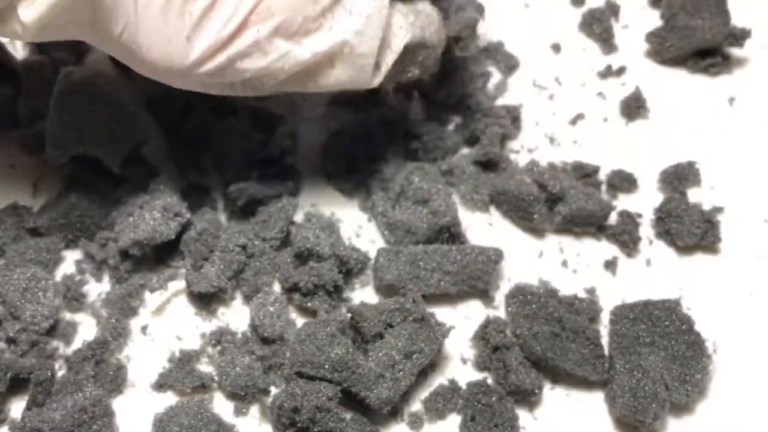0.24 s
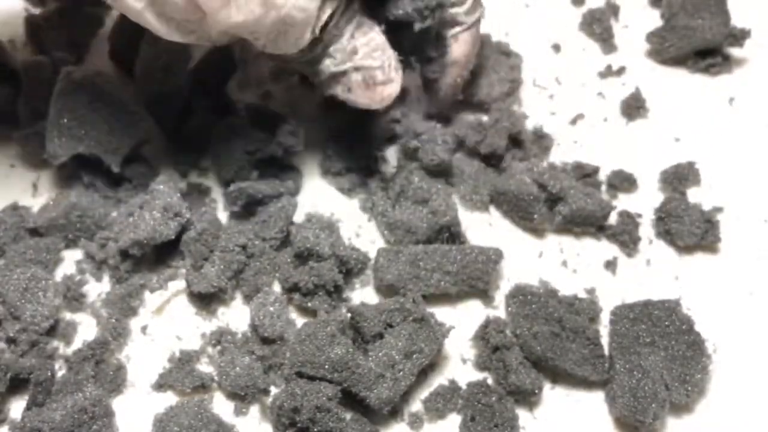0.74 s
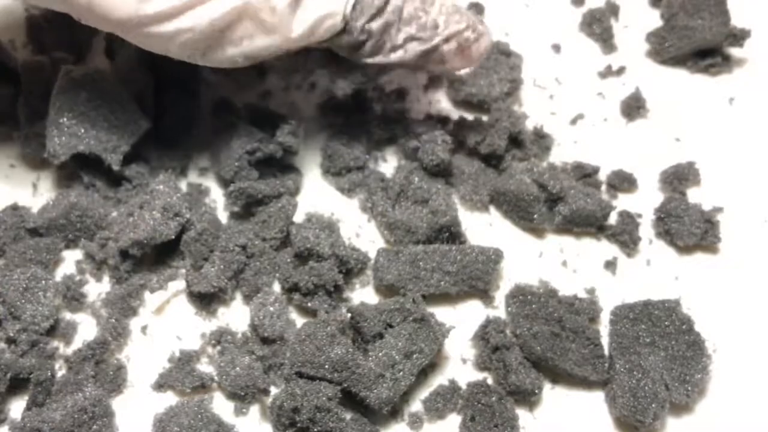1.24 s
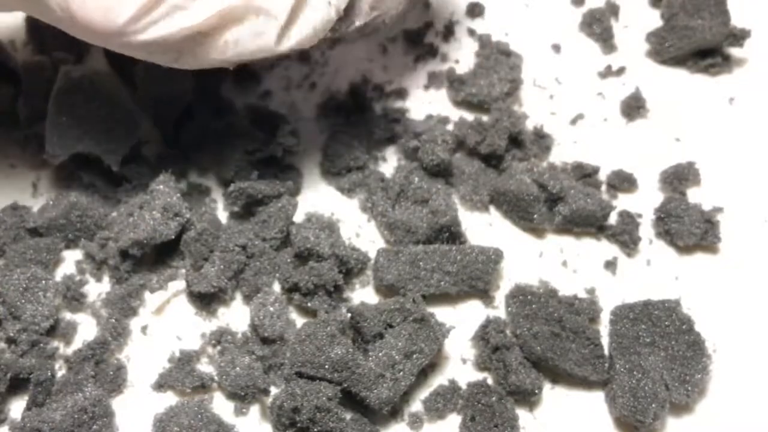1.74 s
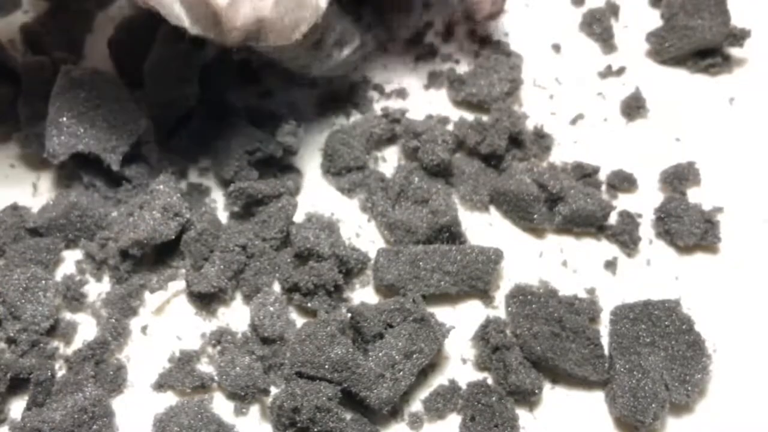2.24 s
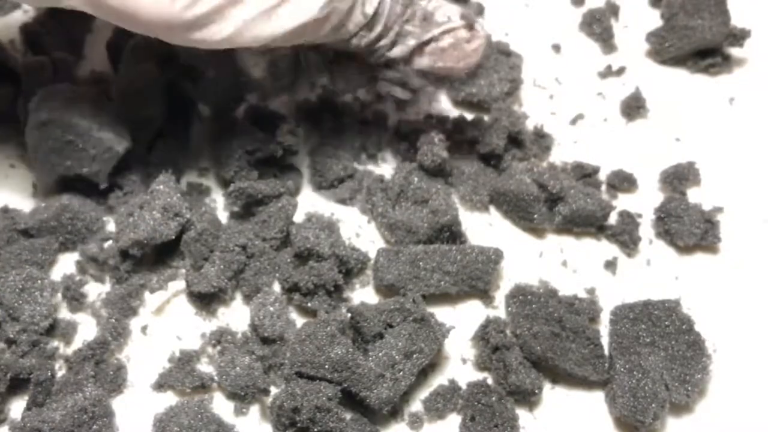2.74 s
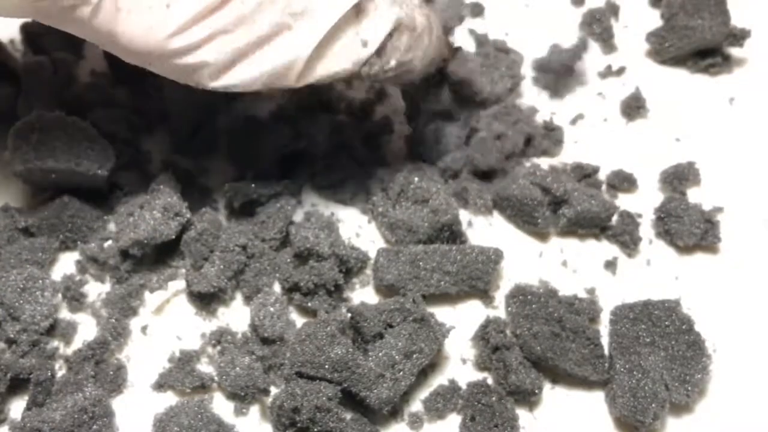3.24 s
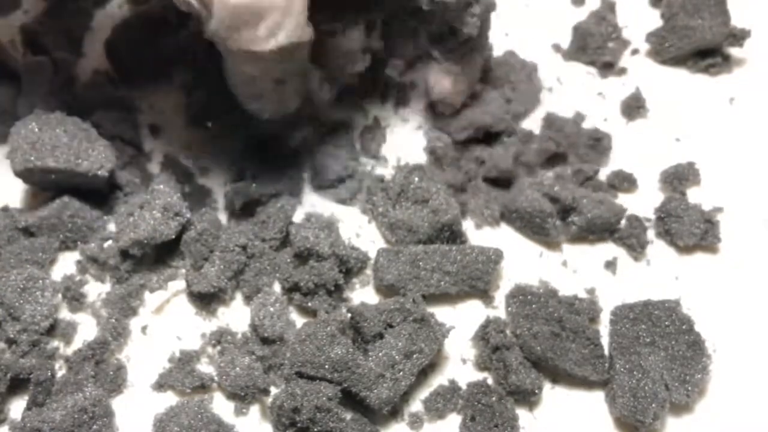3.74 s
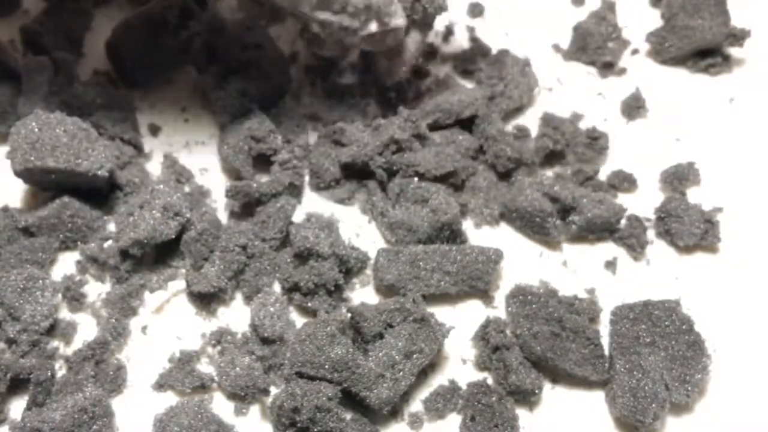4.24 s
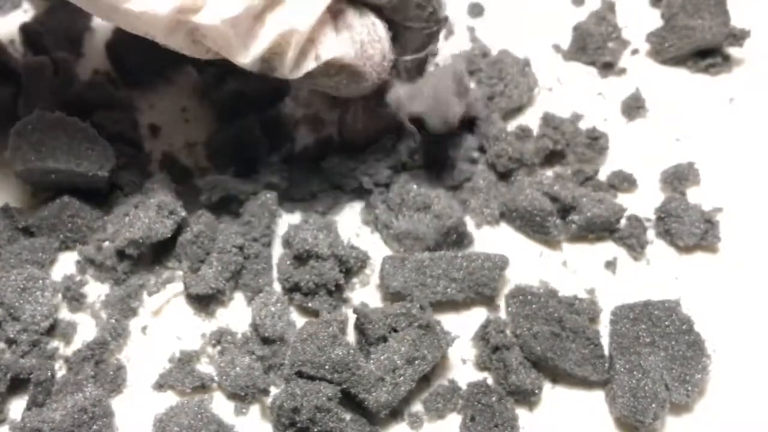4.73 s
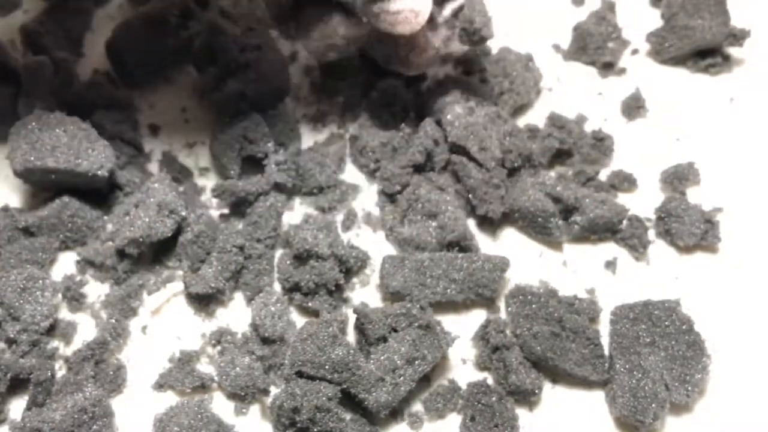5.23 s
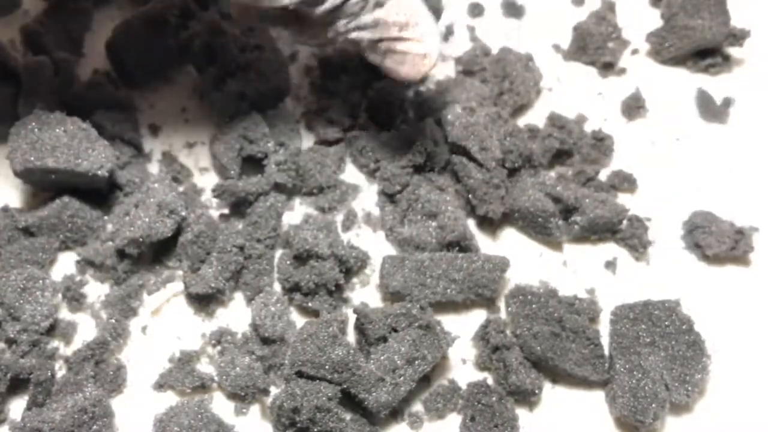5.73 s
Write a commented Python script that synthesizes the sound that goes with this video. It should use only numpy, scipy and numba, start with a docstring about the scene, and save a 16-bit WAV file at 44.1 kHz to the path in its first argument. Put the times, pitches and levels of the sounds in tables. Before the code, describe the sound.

A gloved hand crushes crunchy foam in uneven squeezes, with sharp ticks and fine crackling, while a fridge-like hum drones behind.

```python
"""Dry, brittle foam is squeezed and crumbled by a gloved hand over a table, close to a phone.
In each squeeze the pressure builds, holds and lets go: random impulses, for thousands of tiny cell walls
breaking, ring through the resonances of the pieces in a crisp hiss. Bigger walls crack, one piece snaps
and the rubber glove squeaks faintly, as a gliding tone. Behind it a motor, probably a fridge compressor,
hums in throbbing harmonics in a small room with faint steady tones and shaped noise for its air."""
import sys
import numpy as np
from scipy import signal
from scipy.fft import rfft, irfft
from scipy.io import wavfile
from scipy.ndimage import uniform_filter1d
from numba import njit

SR = 44100
rng = np.random.default_rng(int(sys.argv[2]) if len(sys.argv) > 2 else 0)


def unload_wav(signal):
    """Save mono or channel-first audio to the path in sys.argv[1] as 16-bit WAV at rate SR, clipped to [-1, 1]."""
    wavfile.write(
        sys.argv[1],
        SR,
        np.round(np.clip(np.atleast_2d(signal).T, -1, 1) * 32767).astype(np.int16),
    )


N = 263718
T = np.arange(N) / SR

# Bright ringing of the finest breaks: peaks spread evenly through the treble. Each row: centre in Hz, width in
# Hz, level in dB against the other rows.
BRIGHT_MODES = [(8430, 690, -10), (9530, 1100, -1.5), (10960, 1080, -1), (12160, 1650, 0), (14100, 1150, 0.5),
                (15600, 1300, -6)]


def undb(db):
    """Decibels to gain."""
    return 10 ** (np.asarray(db) / 20)


def unit(x):
    """Scale to rms 1."""
    return x / np.sqrt(np.mean(x ** 2))


def burst(x, db):
    """Scale a short sound to the energy of one millisecond at db."""
    return undb(db) * x * np.sqrt(SR / 1000) / np.linalg.norm(x)


def walk(rate):
    """Smooth chance with rms 1 that changes about rate times a second."""
    step = max(int(SR / rate), 2)
    held = np.repeat(rng.standard_normal(N // step + 1), step)
    return unit(uniform_filter1d(held, step)[:N])


def ringing(modes):
    """Causal impulse response, of energy 1, of a few broad resonances."""
    bins_hz = np.arange(1025) * SR / 2048
    power = sum(undb(db) ** 2 / (1 + (2 * (bins_hz - hz) / width) ** 2) ** 2 for hz, width, db in modes)
    # folding the cepstrum gives minimum phase: the ringing starts at once
    cepstrum = irfft(np.log(power) / 2)
    cepstrum[1:1024] *= 2
    cepstrum[1025:] = 0
    response = irfft(np.exp(rfft(cepstrum)))[:512]
    return response / np.linalg.norm(response)


def through(x, response):
    """Pass a sound through an impulse response."""
    return signal.fftconvolve(x, response)[:N]


@njit
def resonate(x, hz, width):
    """State-variable band-pass whose centre moves."""
    y, band, low = np.empty(len(x)), 0., 0.
    for i in range(len(x)):
        g, k = np.tan(np.pi * hz[i] / SR), width / hz[i]
        v = (band + g * (x[i] - low)) / (1 + g * (g + k))
        band, low, y[i] = 2 * v - band, low + 2 * g * v, k * v
    return y


def add(out, s, sound):
    """Mix a short sound in at time s."""
    i = int(s * SR)
    out[i:i + len(sound)] += sound[:N - i]


def fractures(rate, spread_db):
    """Random impulses, rate a second: most are small, a few are large."""
    hit = rng.random(N) < rate / SR
    size = undb(spread_db * np.minimum(rng.exponential(size=N), 4))
    sign = rng.choice([-1, 1], N)
    return unit(hit * size * sign / np.sqrt(rate))


def scatter(breaks, decay_s, trail_db):
    """Each break throws off dust: a short trail of noise, different every time."""
    keep = np.exp(-1 / (decay_s * SR))
    power = signal.lfilter([1 - keep], [1, -keep], breaks ** 2)
    return breaks + undb(trail_db) * np.sqrt(power) * rng.standard_normal(N)


def rupture(run_s, after_db):
    """One break followed by a quickly dying run of smaller ones."""
    t = T[:600]
    run = rng.standard_normal(len(t)) * np.exp(-t / run_s) * (1 - np.exp(-t / 0.00047))
    push = undb(after_db) * run / np.linalg.norm(run)
    push[0] = 1
    return push


def air():
    """Soft rumble and rush of the room: noise coloured along a smooth spectrum."""
    # Spectrum of the room's air. Each row: frequency in Hz, relative density in dB per Hz.
    spectrum = [(22, -3.5), (43, -1), (85, -4), (125, -10.5), (168, -1.5), (205, -4), (245, -7.5),
                (275, -6.5), (310, -10), (400, -10), (510, -18), (620, -15.5), (820, -8), (1020, -16),
                (1200, -14.5), (1700, -26), (6000, -31.5), (16000, -28.5)]
    air_db = -51  # rms
    hz, db = np.transpose(spectrum)
    noise = rfft(rng.standard_normal(N))
    bins_hz = np.maximum(np.arange(len(noise)) * SR / N, 1)
    colour = undb(np.interp(np.log(bins_hz), np.log(hz), db))
    return undb(air_db) * unit(irfft(noise * colour, N))


def drones():
    """Faint tones of fixed pitch that waver in level."""
    # Weak tones in the room. Each row: pitch in Hz, typical rms level in dB.
    tones = [(20.6, -65), (40.1, -59), (338.5, -69.5), (401, -74), (619, -84.5), (818, -75.5)]
    out = np.zeros(N)
    for hz, db in tones:
        level = undb(db + 2.3 * walk(rate=3.17))
        out += np.sqrt(2) * level * np.sin(2 * np.pi * (hz * T + rng.random()))
    return out


def motor():
    """The rotor slips behind the mains field, so its harmonics throb together about eight times a second."""
    # Shaft harmonics. Each row: multiple of the shaft rate, rms level in dB before throb and swell,
    # lower and upper sideband in dB against the harmonic.
    harmonics = [(1, -55, -32, -36), (2, -54, -31, -11.5), (3, -45.5, -43, -48), (4, -57.5, -7, -1),
                 (5, -67, -17, 2), (6, -57, -60, -5.5), (9, -82, -8, -32), (12, -72, -34, -14)]
    shaft_hz, mains_hz = 46.085, 50.043
    aligned_s, swell_hz = .056, .73  # throb and swell share this zero of phase
    since = T - aligned_s
    throb = np.exp(2j * np.pi * 2 * (mains_hz - shaft_hz) * since)
    # the lowest harmonic also swells and sinks slowly
    swell = 1 + 0.76 * np.exp(2j * np.pi * swell_hz * since)
    out = 0
    for k, db, lower_db, upper_db in harmonics:
        level = undb(db + 0.1 * walk(rate=3.1))
        line = level * np.exp(2j * np.pi * (k * shaft_hz * T + rng.random()))
        line = line * (1 + undb(lower_db) / throb + undb(upper_db) * throb)
        out = out + line * (swell if k == 1 else 1)
    return np.sqrt(2) * out.real


def squeaks():
    """Rubber sticks and slips on the foam: a tone and its octave, falling slightly in pitch."""
    # Slips of the glove. Each row: start in seconds, length in seconds, starting pitch in Hz,
    # level in dB of the fundamental at its peak, ahead of the room.
    slips = [(4.138, .04, 1720, -60), (4.245, .05, 1670, -65)]
    out = np.zeros(N)
    for s, length_s, hz, db in slips:
        t = T[:int(length_s * SR)]
        glide = 1 - 0.056 * t / length_s + 0.015 * walk(rate=600)[:len(t)]
        phase = 2 * np.pi * np.cumsum(hz * glide) / SR
        tone = np.sin(phase) + 0.44 * np.sin(2 * phase)
        add(out, s, undb(db) * np.sin(np.pi * t / length_s) * tone)
    return out


def snap():
    """A stiff piece breaks through with one loud tick."""
    # Resonances of the stiff piece. Each row: centre in Hz, width in Hz, level in dB against the other rows.
    snap_modes = [(880, 260, -14.5), (1470, 1300, -20.5), (2370, 760, -12.5), (4900, 1300, -27),
                  (7130, 470, -8), (8300, 1100, -4), (9190, 730, 4), (11500, 1640, 3), (13600, 2200, -12)]
    tick = np.convolve(rupture(run_s=0.0017, after_db=-9.0), ringing(snap_modes))
    out = np.zeros(N)
    add(out, .2856, burst(tick, db=-6.5))
    return out


def cracks(press_db):
    """Walls give way one at a time; the bigger the piece, the duller and longer the crack."""
    # Thick walls cracking. Each row: start in seconds, level over one millisecond in dB ahead of the room,
    # share of dull ringing in dB against the bright.
    thick = [(0.3234, -35.5, 12), (0.4168, -43, 3), (0.5008, -37.5, 15), (0.7758, -24.5, -8),
             (0.8079, -18, -20), (0.8568, -16, -16), (0.8636, -18, -16), (0.8908, -21, -17),
             (0.9302, -22, -14), (1.0096, -18.5, -18), (1.0262, -14, -21), (1.0306, -22, -19),
             (1.0448, -19, -23), (1.0497, -25, -17), (1.0736, -25, -22), (1.1226, -23, -18),
             (1.1578, -25, -16), (2.483, -34, 1), (2.5353, -30.5, -7), (2.8655, -30, -5), (3.2525, -29, 1),
             (3.2724, -33, -10), (3.658, -37.5, -15), (3.7468, -36.5, 1), (4.0083, -35, -6),
             (4.461, -24, -21), (4.4914, -23, -22), (4.5304, -23, -19), (4.547, -16.5, -5.5),
             (4.6004, -29, -7.5), (4.6777, -34, -7), (5.2731, -26, -13), (5.3293, -27, -21),
             (5.4465, -25.5, -21), (5.543, -29, -13), (5.8845, -38, -6)]
    # Resonances of a thick piece. Each row: centre in Hz, width in Hz, level in dB against the other rows.
    chunk_modes = [(1300, 840, -16), (2760, 970, 1), (4840, 1300, 5), (6640, 660, 5.5)]
    bright, dull = ringing(BRIGHT_MODES), ringing(chunk_modes)
    # thinner walls crack at random, about as strong as the pressure of the moment
    thin_per_s, above_press_db, spread_db = 36, 1, 2
    thin_dull_db, dull_spread_db = -15, 5
    times = rng.random(int(thin_per_s * N / SR)) * T[-1]
    thin = []
    for s in times:
        size, colour = rng.standard_normal(2)
        db = np.interp(s, T, press_db) + above_press_db + spread_db * size
        thin.append((s, db, thin_dull_db + dull_spread_db * colour))
    out = np.zeros(N)
    for s, db, dull_db in [*thick, *thin]:
        push = rupture(run_s=.001 * undb(.2 * dull_db), after_db=-2)
        add(out, s, burst(np.convolve(push, bright + undb(dull_db) * dull), db))
    return out


def squeezing():
    """Each squeeze swells, holds and dies away; overlapping ones add. Gives the dB of cells, crumbs and lumps."""
    # Squeezes of the hand. Each row: full pressure at this many seconds, build-up, hold and release in
    # seconds, level in dB of fine cells breaking, then of crumbs rubbing and of lumps crunching in dB
    # against the cells; all ahead of small trims in the mix.
    squeezes = [(0.002, .11, 0.098, 0.13, -45, -8, -28), (0.292, 0.065, .005, 0.2, -41.5, -9, -13.5),
                (0.537, 0.18, 0.2, 0.59, -42, -8.5, -16.5), (0.848, 0.17, 0.034, 0.3, -25.5, -13.5, -21.5),
                (1.027, .35, 0.19, 0.053, -36.5, -13, -24), (1.376, 0.089, 0.018, 0.15, -41.5, -9, -15),
                (1.498, 0.2, .02, 0.2, -44, -13.5, -20), (1.687, 0.13, .16, 0.08, -34.5, -9.5, -16.5),
                (2.015, 0.12, 0.012, .07, -39, -12.5, -13.5), (2.228, .068, .005, 0.45, -42, -10.5, -15.5),
                (2.441, .43, .29, 0.32, -38.5, -11, -19.5), (2.864, 0.12, .003, 0.038, -34, -8.5, -21.5),
                (3.028, 0.45, 0.011, .45, -42.5, -9, -18), (3.237, 0.13, .014, .052, -30, -11, -21),
                (3.41, .32, .13, 0.16, -49.5, -10.5, -13), (3.728, 0.12, .01, 0.22, -50, -5, -14),
                (3.924, .12, .024, 0.072, -44.5, -12.5, -21), (4.158, 0.14, .008, 0.35, -45, -11.5, -17),
                (4.546, .34, 0.0046, 0.084, -29.5, -12.5, -29), (4.786, 0.38, .006, .07, -44, -6.5, -16),
                (4.894, .18, .01, .06, -47, -5.5, -18), (5.04, .18, .013, .13, -41, -8.5, -15),
                (5.165, .083, .17, 0.3, -38, -10.5, -19.5), (5.437, 0.14, .003, 0.12, -35, -11, -25),
                (5.548, 0.082, .003, .075, -36.5, -8, -14), (5.626, .21, .05, .29, -48.5, -10, -16)]
    fade_db = 20  # gained over each build-up time, lost over each release time

    def powers(cells_db, crumbs_db, lumps_db):
        return undb(cells_db + np.array([[0], [crumbs_db], [lumps_db]])) ** 2

    # between squeezes the foam still shifts in the glove
    total = powers(cells_db=-57, crumbs_db=-5, lumps_db=-15)
    for s, build_s, hold_s, release_s, *levels in squeezes:
        before = np.maximum(s - T, 0) / build_s
        after = np.maximum(T - s - hold_s, 0) / release_s
        slack = np.minimum(before + after, 10)
        total = total + powers(*levels) * undb(-fade_db * slack) ** 2
    return 10 * np.log10(total)


def crumbling(press_db, crumb_db, lump_db):
    """Cell walls break in little avalanches, more of them the harder the hand presses."""
    # Resonances of the pieces, from crumbs to the whole block.
    # Each row: centre in Hz, width in Hz, level in dB against the other rows.
    crumb_modes = [(4493, 950, 0.5), (5300, 1330, -5), (6965, 1140, 1.5), (8000, 1400, -7.5)]
    lump_modes = [(1810, 790, 1.5), (2435, 970, 5), (3160, 650, 8)]
    block_modes = [(1060, 400, 3.5), (1400, 720, 0), (2010, 330, 7.5)]
    # The hollow of the hand as it opens and closes. Each row: time in seconds, resonance in Hz.
    hollow = [(0, 2620), (1.6, 2700), (2.0, 2530), (2.6, 2830), (3.0, 2550), (3.5, 2560), (3.9, 3050),
              (4.55, 2700), (5.0, 2880), (5.98, 3030)]
    rate = 3600 * undb(.55 * (press_db + 40))  # breaks a second
    avalanche = unit(undb(1.26 * walk(rate=280) + 1.14 * walk(rate=67)))
    shared = fractures(rate, spread_db=4.0)

    def pieces(modes):
        """A break shakes pieces of every size; each size also has breaks of its own."""
        breaks = (shared + 1.15 * fractures(rate, spread_db=2.5)) * avalanche
        return unit(through(scatter(breaks, decay_s=0.004, trail_db=-5.0), ringing(modes)))

    cells, crumbs = pieces(BRIGHT_MODES), pieces(crumb_modes)
    lumps, block = pieces(lump_modes), pieces(block_modes)
    # the air cupped in the hand rings with the lumps
    hollow_hz = np.interp(T, *np.transpose(hollow))
    cupped = unit(resonate(lumps, hollow_hz, 460.0))
    lumps = unit(lumps + undb(1) * cupped)
    # the harder the crunch, the more the whole block shakes with the lumps
    block_db = -5 + 0.43 * (lump_db + 45.5)
    body = lumps + undb(block_db) * block
    return undb(press_db - 0.5) * cells + undb(crumb_db + 0.38) * crumbs + undb(lump_db + 0.24) * body


def room(x, t60, wet_db):
    """Direct sound, a few early echoes and the faint, short tail of a small room, at total energy 1."""
    # Early echoes from the table and things on it.
    # Each row: delay in seconds, level in dB against the direct sound.
    echoes = [(.00135, -26), (.0029, -18), (.0047, -18.5)]
    t = T[:SR // 2]
    tail = rng.standard_normal(len(t)) * np.exp(-np.log(1000) * t / t60) * (t > .003)
    response = undb(wet_db) * tail / np.linalg.norm(tail)
    response[0] = 1
    for s, db in echoes:
        add(response, s, undb([db]))
    return through(x, response / np.linalg.norm(response))


def scene():
    """Foam in front of the microphone, the hum behind it."""
    press_db, crumb_db, lump_db = squeezing()
    foam = crumbling(press_db, crumb_db, lump_db) + cracks(press_db) + snap() + squeaks()
    background = motor() + drones() + air()
    return (room(foam, t60=0.19, wet_db=-19.5) + background)[None]


def record(dry):
    """The phone clips at full scale and cuts the top."""
    top_hz = 15800
    low_pass = signal.ellip(14, .1, 75, top_hz, fs=SR, output="sos")  # order, ripple dB, stop-band dB
    return signal.sosfilt(low_pass, np.clip(dry, -1, 1))


dry = scene()
out = record(dry)
unload_wav(out)
```